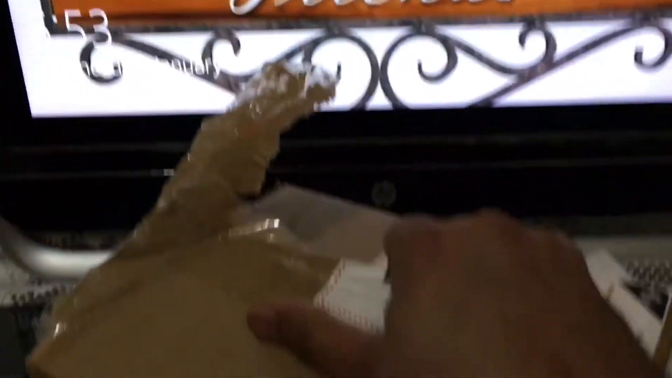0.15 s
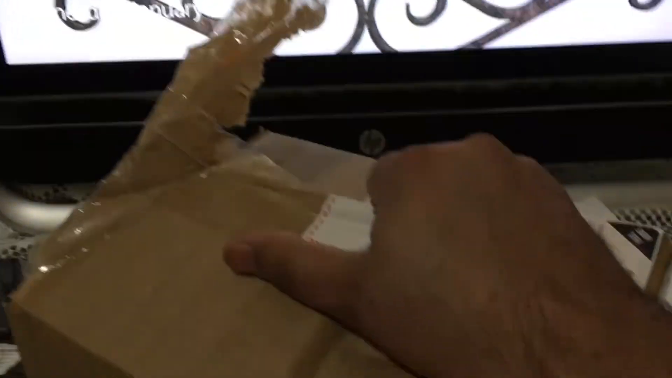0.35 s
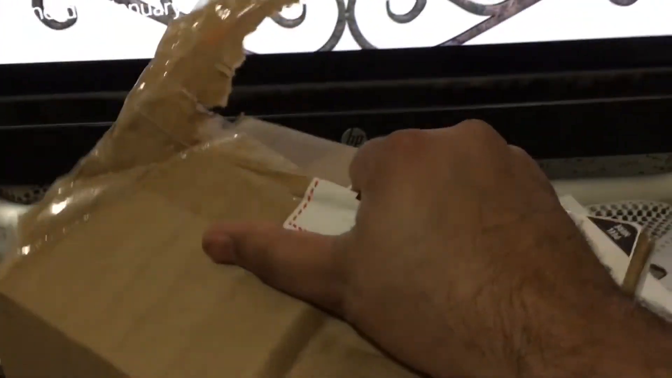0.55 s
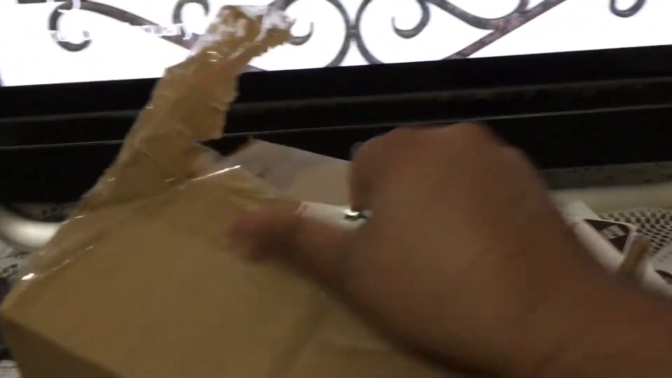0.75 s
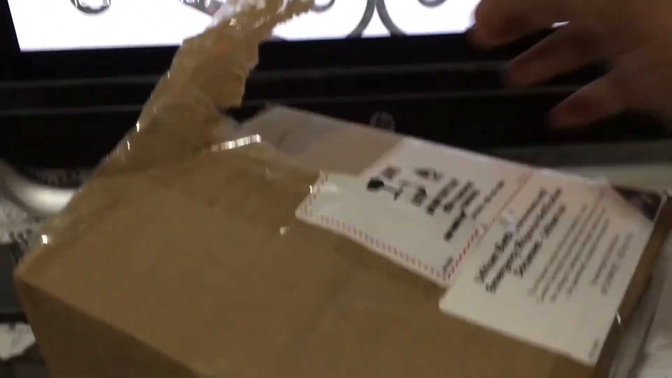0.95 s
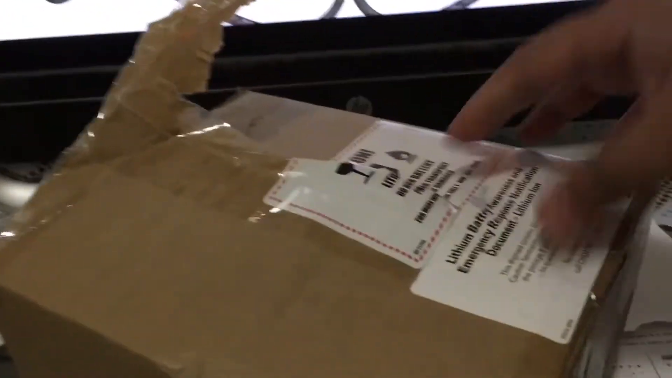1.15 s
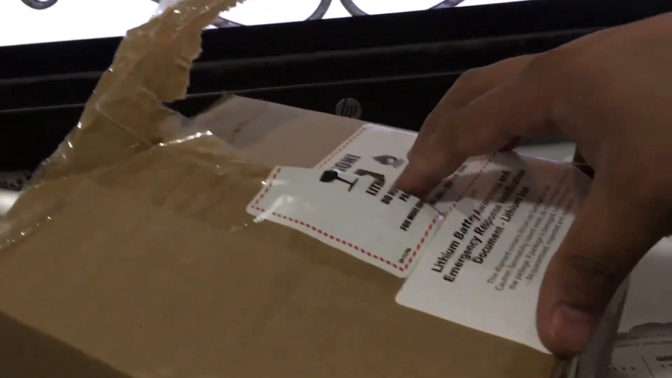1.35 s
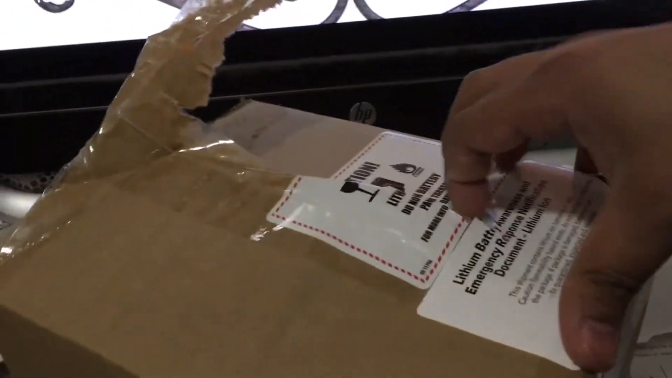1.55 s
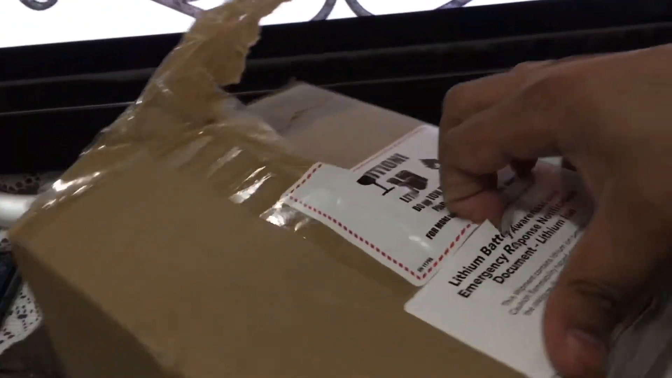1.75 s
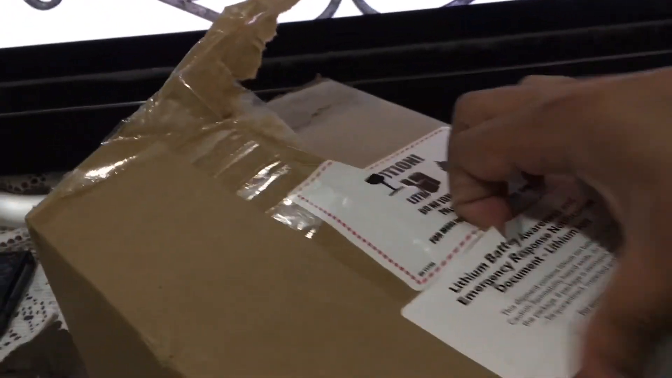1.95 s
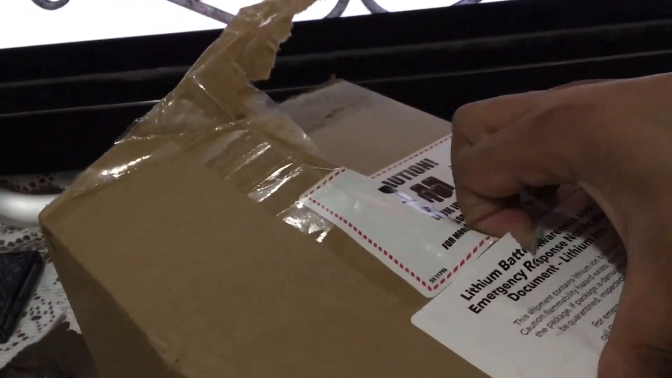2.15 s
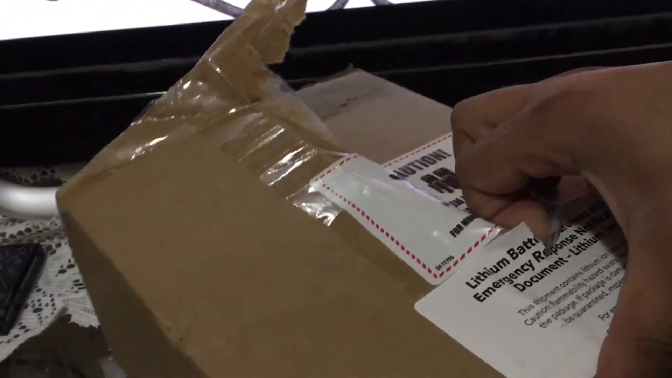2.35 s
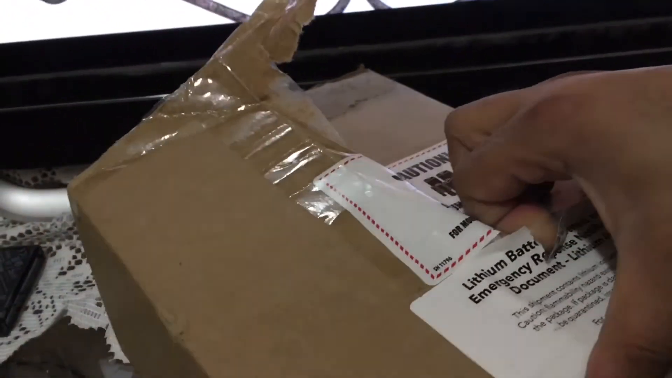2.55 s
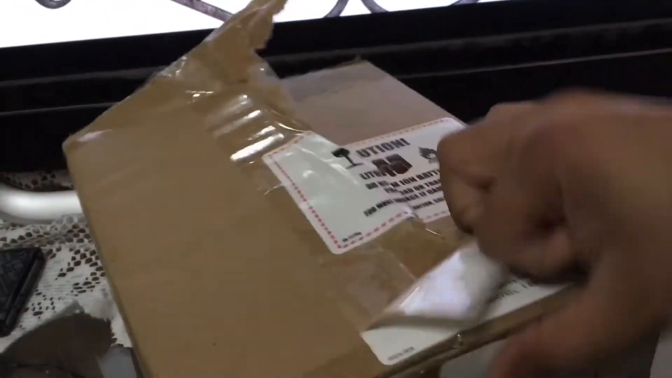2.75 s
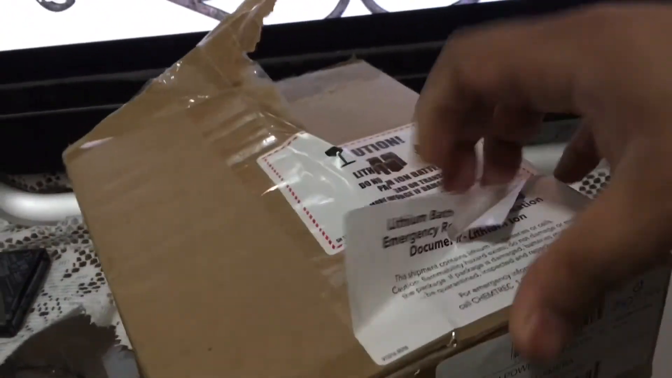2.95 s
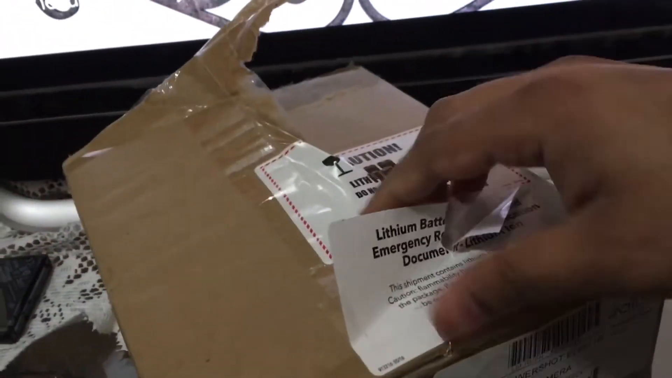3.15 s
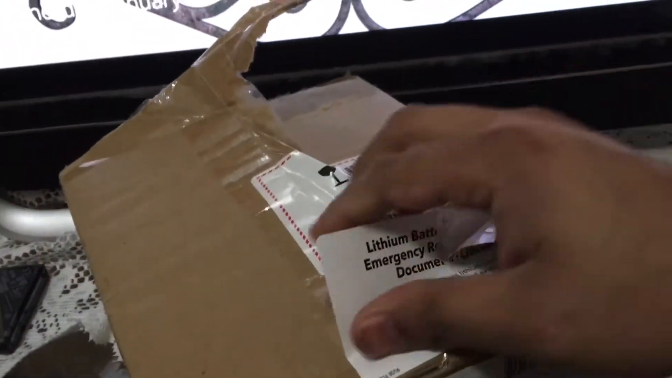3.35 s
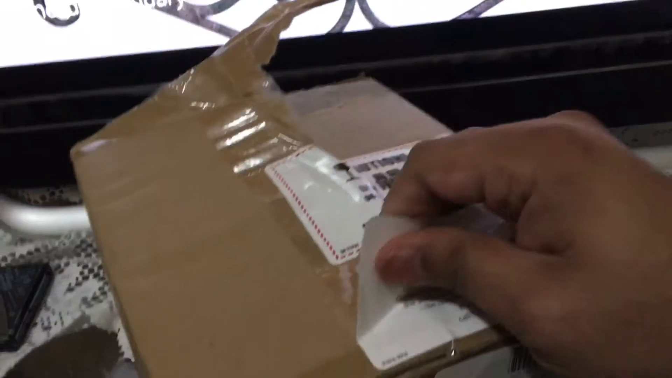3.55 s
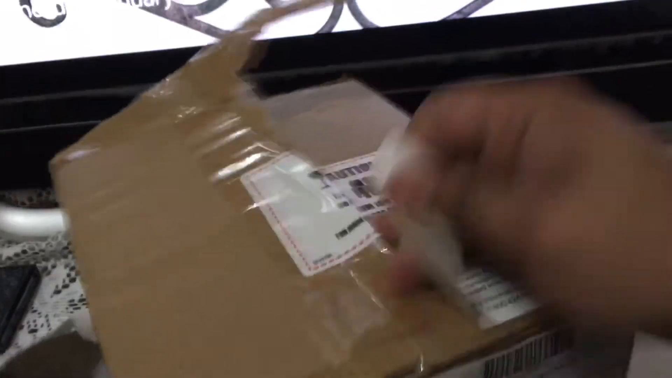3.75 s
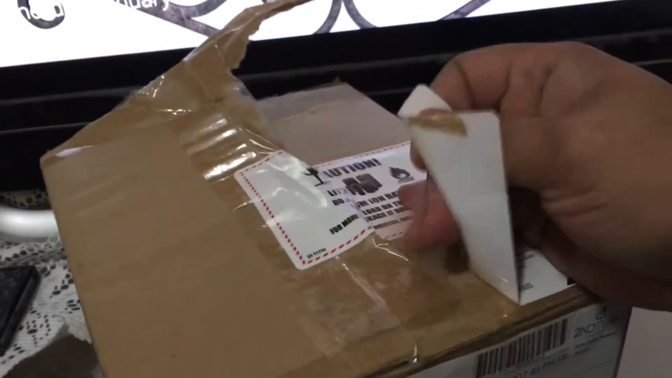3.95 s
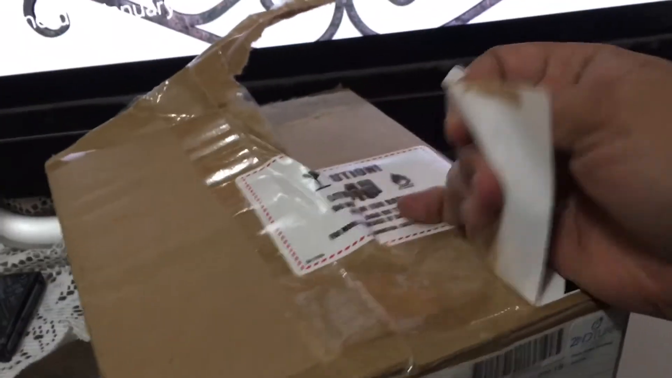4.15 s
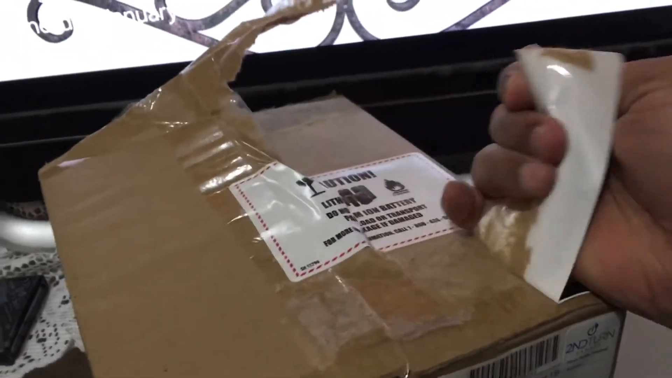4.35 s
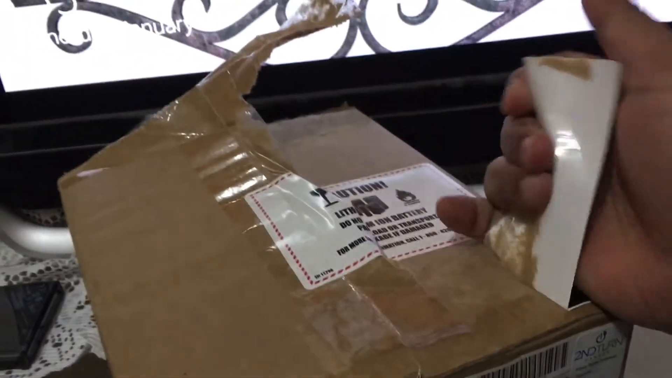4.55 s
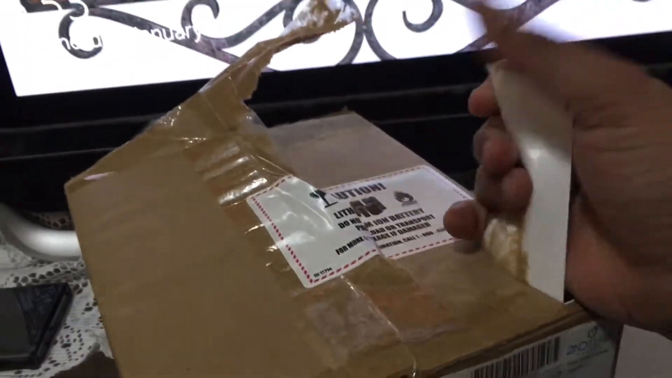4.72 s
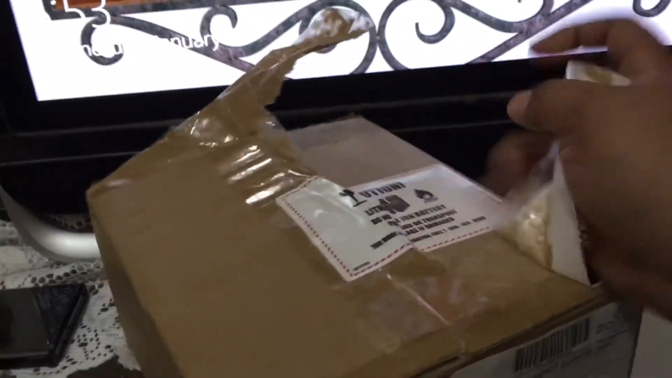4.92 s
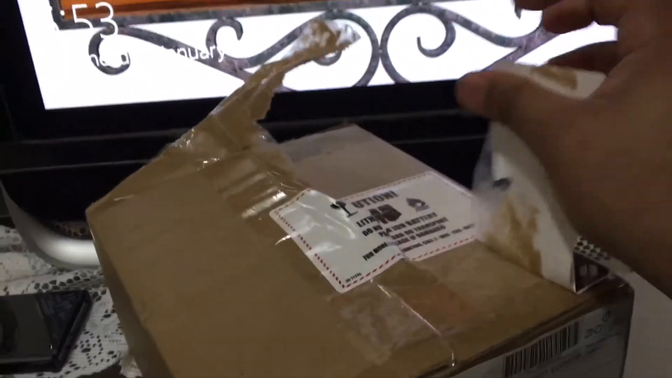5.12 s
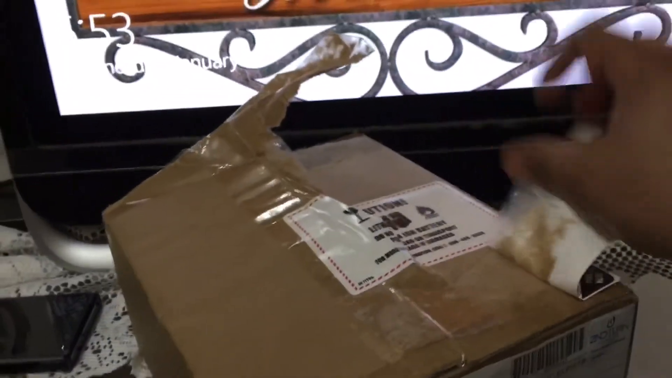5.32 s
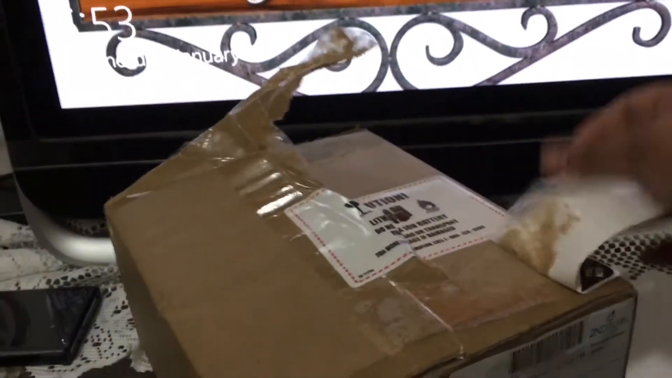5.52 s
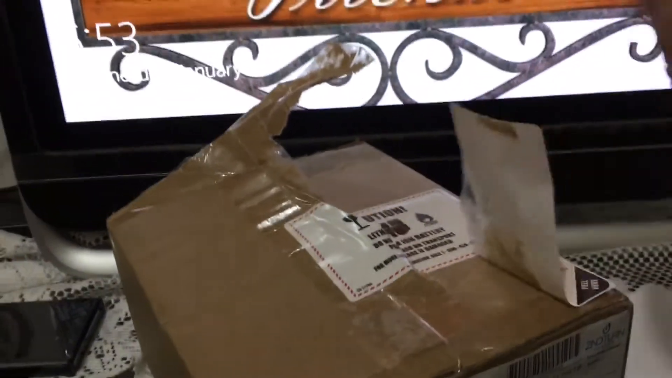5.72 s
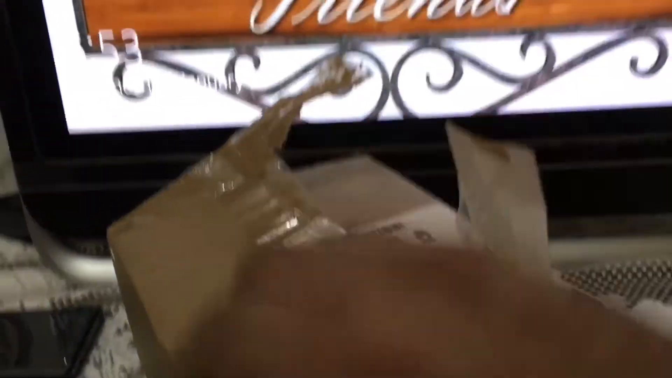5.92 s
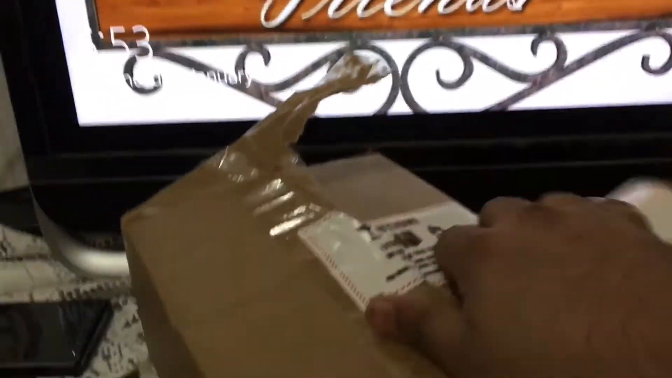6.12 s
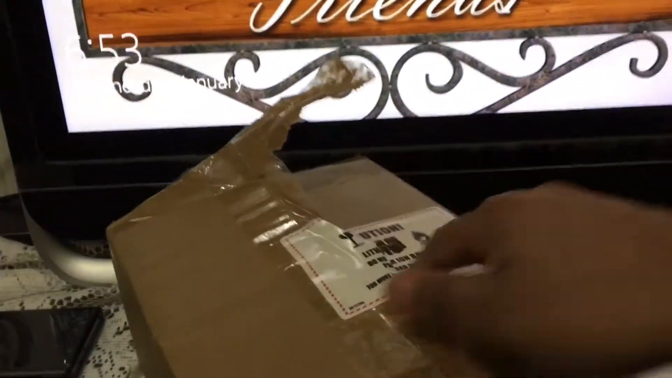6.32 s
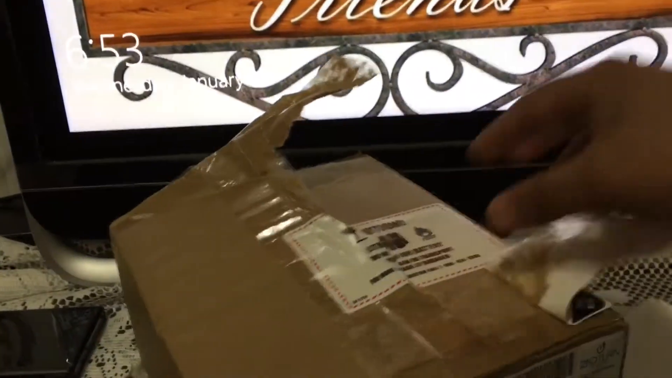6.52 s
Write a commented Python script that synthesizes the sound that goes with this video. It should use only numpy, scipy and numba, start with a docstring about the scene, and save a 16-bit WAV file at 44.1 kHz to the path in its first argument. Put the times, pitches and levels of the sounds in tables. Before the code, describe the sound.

A stuck label is picked at and torn off a cardboard box by hand, with sharp rips, film crackles and dry paper creases close up.

```python
"""A taped label is picked at and torn off a cardboard box by hand, close to a phone's microphone in a small room.
Adhesive rips, film ticks, paper creases and finger taps are cracks, slips and flutter coloured by the box.
Each pull crackles and each stroke rubs, as dense stick-slip noise; bumped panels and the jolted desk ring as decaying sines.
A short echo, a faint squeak and a low room hum lie around them; the microphone rounds off the loudest peaks."""
import sys
import numpy as np
from scipy import signal
from scipy.fft import rfft, irfft
from scipy.io import wavfile
from scipy.ndimage import uniform_filter1d
from numba import njit

SR = 44100
rng = np.random.default_rng(int(sys.argv[2]) if len(sys.argv) > 2 else 0)


def master_out(mix):
    """Clip the mix to full scale and print it as 16-bit PCM to the path in sys.argv[1]."""
    frames = np.transpose(np.atleast_2d(mix))
    ceiling = np.clip(frames, -1, 1)
    pcm = np.round(ceiling * 32767).astype(np.int16)
    wavfile.write(sys.argv[1], SR, pcm)


N = 294588
TIME = np.arange(N) / SR
STEPS = np.arange(0, N, 32) / SR  # coarse clock for the hand [s]


def undb(db):
    """Decibels to gain."""
    return 10 ** (np.asarray(db) / 20)


def unit(x):
    """Scale to rms 1."""
    return x / np.sqrt(np.mean(x ** 2))


def decay(t, t60):
    """Exponential decay that falls by 60 dB in t60 seconds."""
    return np.exp(-np.log(1000) * t / t60)


def add(out, s, x):
    """Mix x into out from time s on."""
    i = max(0, int(s * SR))
    out[i:i + len(x)] += x[:len(out) - i]


def slope(hz, points):
    """Read (frequency [Hz], value) points on a log-frequency axis."""
    f, value = np.transpose(points)
    return np.interp(np.log(hz + 1), np.log(f), value)


def humps(hz, peaks):
    """Gain in dB of a set of (frequency [Hz], width [Hz], gain [dB]) resonances."""
    return sum(db / (1 + (2 * (hz - f) / width) ** 2) for f, width, db in peaks)


def response(points, peaks=(), size=2048):
    """Causal (minimum-phase) impulse response of a colour with resonances on top."""
    hz = np.fft.rfftfreq(size, 1 / SR)
    gain = undb(slope(hz, points) + humps(hz, peaks))
    # folding the cepstrum puts all the energy after time zero
    cepstrum = irfft(np.log(gain))
    cepstrum[1:size // 2] *= 2
    cepstrum[size // 2 + 1:] = 0
    return irfft(np.exp(rfft(cepstrum)))


def tint(x, points, peaks=(), size=2048):
    """Pass x through a colour."""
    return signal.oaconvolve(x, response(points, peaks, size))[:len(x)]


def whiten(x, size=90):
    """Even out the broad shape of a burst's spectrum and keep its fine ripple."""
    spectrum = rfft(x)
    broad_power = uniform_filter1d(np.abs(spectrum) ** 2, size)
    return irfft(spectrum / np.sqrt(broad_power + 1e-12), len(x))


def walk(rate):
    """Random wander with a spread near 1: straight lines between `rate` random points per second."""
    knots = rng.standard_normal(2000)
    return np.interp(TIME * rate, np.arange(len(knots)), knots)


def slips(count, rate, spread_db):
    """Tiny stick-slip releases, `rate` per second on average: many small ones, a few large."""
    hit = rng.random(count) < rate / SR
    size = undb(spread_db * np.minimum(rng.exponential(size=count), 4))
    return hit * size * rng.standard_normal(count)


@njit
def resonator(x, hz, q):
    """Band-pass whose centre moves; gain 1 at the centre."""
    y, band, low = np.empty(len(x)), 0., 0.
    for i in range(len(x)):
        g = np.tan(np.pi * hz[i] / SR)
        v = (band + g * (x[i] - low)) / (1 + g * (g + 1 / q))
        band, low, y[i] = 2 * v - band, low + 2 * g * v, v / q
    return y


def curves(table):
    """Columns of a time table, joined by straight lines."""
    s, *columns = np.transpose(table)
    return [np.interp(TIME, s, c) for c in columns]


SWELL_DB = 1  # a stroke is this much weaker at its ends than in the middle


def stroke(start, length, attack_s, release_s):
    """One movement of the hand sets in, swells towards its middle and dies away."""
    t = STEPS - start
    arch = np.sin(np.pi * np.clip(t / length, 0, 1))
    swell = undb(SWELL_DB * (arch - 2 / np.pi))
    return swell * np.clip(t / attack_s, 0, 1) * np.exp(-np.maximum(t - length, 0) / release_s)


# the hand rests on the label and stirs faintly: (start [s], length [s], relative level [dB])
RESTS = [(0, .95, -65), (1.02, 4.2, -64), (6.108, 0.51, -60.5)]
REST_RUSTLE_DB, REST_RUB_DB = 0, -1  # against the crackle of the resting hand
# skin and paper slide over the box: (start [s], length [s], relative level [dB],
# crackle against that [dB], pitch of the paper [Hz])
RUBS = [(-0.05, 0.075, -35.5, -18, 1450), (0.03, 0.31, -44.5, -6.5, 1500), (0.36, 0.12, -52.5, -0.5, 2500),
        (0.48, 0.11, -48, -1, 3690), (0.67, 0.22, -46, -8, 2070), (0.81, 0.075, -39.5, -10, 1920),
        (1.57, 0.051, -36.5, -17, 1400), (1.71, 0.13, -43.5, -5.5, 1350), (2.13, 0.36, -47.5, -4.5, 1785),
        (2.69, 0.22, -48, -10, 1700), (3.16, 0.069, -46, -12.5, 1040), (3.32, 0.039, -48, -10, 1398),
        (3.48, .5, -45, -6, 1886), (4.28, 0.065, -36, -7, 1930), (4.83, 0.053, -39, -19, 2200),
        (5.0, 0.16, -51, -9, 2080), (5.59, 0.07, -44.5, -7.5, 2550), (6.13, 0.068, -47, -20, 2200),
        (6.3, 0.073, -44, -9.5, 2170), (6.53, 0.1, -49, -6.5, 2360)]
RUB_ATTACK_S, RUB_RELEASE_S, RUB_RUSTLE_DB = 0.022, 0.035, -6  # rustle: paper moved by a rub
# the tape is pulled and creeps off: (start [s], length [s], relative level [dB],
# rustle against that [dB], pitch of the film [Hz])
PEELS = [(0.543, 0.067, -44, -7.5, 8670), (1.998, 0.034, -53, -3, 5800), (2.139, 0.14, -61.5, -18, 12860),
         (2.336, 0.12, -48.5, -6.5, 9160), (2.445, 0.32, -45, -9.5, 6730), (3.552, .3, -43.5, -7, 13240),
         (4.048, 0.19, -35, -2, 12740), (4.208, 0.18, -37.5, -0.5, 9000), (4.652, 0.29, -46, -1, 13000),
         (4.918, .07, -40, 8.5, 9000), (5.483, 0.11, -43.5, -2, 8500)]
PEEL_ATTACK_S, PEEL_RELEASE_S, PEEL_RUB_DB = .04, 0.027, -10  # rub: box dragged by a pull


def handling():
    """Levels in dB of crackle, rustle and rubbing: all strokes add up in power."""
    moves = []
    for s, length, db in RESTS:
        resting = (STEPS >= s) & (STEPS < s + length)
        moves.append((resting, (db, db + REST_RUSTLE_DB, db + REST_RUB_DB)))
    for s, length, db, crackle, _ in RUBS:
        rub = stroke(s, length, RUB_ATTACK_S, RUB_RELEASE_S)
        moves.append((rub, (db + crackle, db + RUB_RUSTLE_DB, db)))
    for s, length, db, rustle, _ in PEELS:
        pull = stroke(s, length, PEEL_ATTACK_S, PEEL_RELEASE_S)
        moves.append((pull, (db, db + rustle, db + PEEL_RUB_DB)))
    shapes, levels = zip(*moves)
    powers = undb(levels).T ** 2 @ np.array(shapes) ** 2 + 1e-12
    return [np.interp(TIME, STEPS, 10 * np.log10(power)) for power in powers]


def flap_pitch(strokes):
    """The free flap bends from the pitch of one stroke to that of the next."""
    return curves(sorted((s + length / 2, hz) for s, length, _, _, hz in strokes))[0]


# colours of the friction sounds: (frequency [Hz], relative level [dB])
CRACKLE_COLOUR = [(1000, -36), (3000, -5), (5000, -4.5), (6200, -2), (8000, 0.5), (11000, 2), (13000, 0),
                  (16000, -3)]
RUSTLE_COLOUR = [(400, -34.5), (1000, -11.5), (1600, -4), (2300, -3), (3500, -5), (6000, -12), (14000, -39)]
RUBBING_COLOUR = [(30, -12.5), (100, -6), (220, -3), (400, 0), (700, -9.5), (1300, -5.5), (2500, -26),
                  (8000, -31.5)]
# narrow resonances of the stiff film: (frequency [Hz], width [Hz], gain [dB])
FILM_PEAKS = [(3830, 250, 3.5), (5550, 360, 7.5), (6750, 400, 4.5), (7770, 620, -2), (10400, 460, -8)]
# resonances of the cardboard and the taut tape: (frequency [Hz], width [Hz], gain [dB])
BOX_PEAKS = [(220, 110, 6), (376, 59, 1.5), (604, 270, -4.5), (738, 270, 6), (843, 72, 0.5),
             (1210, 38, -3.5), (1620, 87, 0.5), (2030, 290, 0), (2860, 190, -3), (4160, 72, 1),
             (6260, 1500, 3), (9050, 380, 3.5), (10550, 460, -5)]
FILM_RING, PAPER_RING, FLAP_Q = .8, 1.4, 6.  # how strongly film and paper ring, and how sharply
STRAY_PER_S, STRAY_DB = 57, -3.5  # lone ticks of the touched film, against the dense slips


def friction(crackle_rate=1500, crackle_spread_db=1.5, rustle_rate=1200, rustle_spread_db=4.0,
             hiss=0.79, uneven_db=2.0):
    """Adhesive threads part and paper bends in dense uneven slips; skin drags on cardboard as noise."""
    crackle_db, rustle_db, rub_db = handling()
    paper_hz, film_hz = flap_pitch(RUBS), flap_pitch(PEELS)
    grip_db = uneven_db * walk(55)
    crackle = unit(slips(N, crackle_rate, crackle_spread_db)) + hiss * rng.standard_normal(N)
    crackle = crackle + undb(STRAY_DB) * unit(slips(N, STRAY_PER_S, crackle_spread_db))
    rustle = unit(slips(N, rustle_rate, rustle_spread_db)) + hiss * rng.standard_normal(N)
    # the flap colours both as it grows and bends
    crackle = crackle + FILM_RING * resonator(crackle, film_hz, FLAP_Q)
    rustle = rustle + PAPER_RING * resonator(rustle, paper_hz, FLAP_Q)
    crackle = unit(tint(crackle, CRACKLE_COLOUR, FILM_PEAKS))
    rustle = unit(tint(rustle, RUSTLE_COLOUR, BOX_PEAKS))
    rubbing = unit(tint(rng.standard_normal(N), RUBBING_COLOUR, BOX_PEAKS))
    return (crackle * undb(crackle_db + grip_db - .5)
            + rustle * undb(rustle_db + grip_db - 2.0)
            + rubbing * undb(rub_db + grip_db - 4.0))


# colour of the echo: (frequency [Hz], relative level [dB])
ECHO_COLOUR = [(60, -18), (300, 4), (1000, -1), (2000, -4), (6000, -2.5), (15000, 0)]
# how long each band of the echo rings: (frequency [Hz], time to fall 60 dB [s])
ECHO_T60 = [(150, 0.34), (1000, 0.39), (4000, 0.48), (14000, 0.15)]
# hollow things around the desk sing along: (frequency [Hz], width [Hz], gain [dB])
ECHO_PEAKS = [(238, 17, 1.5), (368, 25, 6), (767, 5.4, 5), (1138, 27, 7.5), (1610, 23, 3), (1690, 17, 7.5),
              (2050, 36, 1.5), (2150, 30, 4), (3080, 25, 6), (3300, 60, 2), (4340, 30, 6.5), (5800, 35, 7),
              (8388, 55, 6)]


def room(x, echo_db=-11, gap_s=0.0018, early=1.42, early_s=0.016):
    """Desk and screen reflect almost at once; the walls leave a short tail whose bands die at their own rates."""
    t = TIME[:SR // 2]
    hz = np.fft.rfftfreq(len(t), 1 / SR)
    noise = rfft(rng.standard_normal(len(t)))
    tail = 0
    for k, (_, t60) in enumerate(ECHO_T60):
        share = slope(hz, [(f, j == k) for j, (f, _) in enumerate(ECHO_T60)])
        tail = tail + irfft(noise * share, len(t)) * decay(t, t60)
    tail = tail * np.minimum(t / gap_s, 1) ** 2 * (1 + early * np.exp(-t / early_s))
    tail = tint(tail / np.sqrt(np.sum(tail ** 2)), ECHO_COLOUR, ECHO_PEAKS, size=8192)
    return x + undb(echo_db) * signal.fftconvolve(x, tail)[:N]


# colour of the quiet room: (frequency [Hz], relative level [dB])
HUM_COLOUR = [(20, -31), (55, -3), (90, -10.5), (150, -11.5), (300, -10.5), (450, -10.5), (600, -15.5),
              (1200, -15.5), (1450, -25), (2000, -19.5), (3000, -31.5), (6000, -36.5), (16000, -46)]
# its resonances: (frequency [Hz], width [Hz], gain [dB])
HUM_PEAKS = [(122, 20, 9), (352, 92, 2), (1160, 110, 0.5)]
# two tones that change as the phone moves: (time [s], low tone level [dB], high tone level [dB])
HUM_TONES = [(0, -61.5, -62), (2.5, -65.5, -59), (3.6, -58.5, -72.5), (4.8, -73, -59), (5.6, -59, -59),
             (6.68, -54, -82)]
# their mean pitches: (low tone [Hz], high tone [Hz])
HUM_TONES_HZ = (204, 385.4)
HUM_DB = -52.5  # rush level, before its waver


def hum(waver_db=-1.5, drift_hz=4):
    """Low rush of the room, as coloured noise, with two wavering tones, perhaps a fan."""
    noise = unit(tint(rng.standard_normal(N), HUM_COLOUR, HUM_PEAKS, size=8192))
    rush = noise * undb(HUM_DB + waver_db * walk(2.6))
    tones = 0
    for hz, db in zip(HUM_TONES_HZ, curves(HUM_TONES)):
        level = undb(db + 2 * walk(4.7)) * np.sqrt(2)
        turns = np.cumsum(hz + drift_hz * walk(25)) / SR
        tones = tones + level * np.sin(2 * np.pi * turns)
    return rush + tones


# fingers land on the cardboard: (time [s], relative level [dB], length of the contact [ms], brightness [dB])
TAPS = [(0.2085, -11.5, 1.1, 4), (0.262, -28, .4, -15), (0.7977, -29.5, 2, 9), (0.8208, -38, 1.1, -9),
        (0.879, -34.5, 11.7, -11), (1.602, -42, 12, 0), (1.636, -35.5, 0.78, -9), (5.157, -33, 5.8, -2),
        (6.1006, -31, 0.32, 22), (6.104, -30, 1.3, -13), (6.1383, -36.5, 0.81, -14),
        (6.6034, -34.5, 4.2, 5.5)]
# the thin film crinkles in ticks: (time [s], relative level [dB], pitch [Hz], brightness [dB])
TICKS = [(0.559, -37.5, 8910, 11), (0.8535, -36, 830, -4), (1.456, -45, 3400, -17), (1.6841, -38, 6000, 5),
         (2.125, -38.5, 1210, -10), (2.2609, -23.5, 1890, 3.5), (2.3546, -28, 9340, 17),
         (2.365, -31, 8790, 14), (2.444, -22, 7140, 2), (2.4595, -15, 12220, 1.5), (2.6358, -16, 6560, -7),
         (2.672, -20, 3930, -5), (2.7025, -13, 6840, -3), (2.7126, -5.5, 5950, 4), (3.055, -39.5, 5690, -8),
         (3.064, -45, 7940, -2), (3.499, -38.5, 600, -12.5), (3.5684, -12.5, 3780, 0.5),
         (3.652, -29, 5600, -2), (3.786, -33.5, 12470, -1), (4.4222, -27, 5000, -2), (4.5158, -33, 9140, 2),
         (4.948, -17.5, 8800, 3), (5.4499, -35.5, 3870, -10), (6.4225, -35, 3130, -9)]
# the adhesive lets go and rings the box: (time [s], relative level [dB], length of the tear [ms],
# pitch of the freed patch [Hz], brightness [dB])
RIPS = [(0.8746, -24.5, 1.7, 2260, 11.5), (2.6875, -9, 4.9, 2980, 10), (2.695, -23.5, 32, 885, 5),
        (2.7326, -8, 11.1, 1710, 4), (3.812, -9, 16.8, 2230, 6.5), (3.8338, -14, 11.6, 1800, 4.5),
        (3.8537, -6.5, 0.64, 1920, -1.5), (3.8667, -11, 4, 1690, -1.5), (3.8786, -9, 1.1, 1900, -5.5),
        (3.8852, -10, 1.54, 1870, 1.5), (4.0345, -8, 0.47, 1690, 7.5), (4.1449, -9.5, 1.45, 6570, -0.5),
        (4.1482, -11.5, 0.71, 2220, -6), (4.2256, -5.5, 0.8, 2040, 3), (4.2384, -6, 2.3, 1950, 3.5),
        (4.2454, -7.5, 0.74, 1690, 0), (4.2717, -8, 0.76, 1690, 0), (4.2815, -11.5, 3.2, 1690, -2.5),
        (4.2962, -8, 1.5, 2110, -0.5), (4.3486, -9.5, 0.64, 2090, -1), (4.81, -19.5, 6.3, 2620, -0.5),
        (4.8179, -16, 3.1, 2350, 5.5), (4.8238, -13.5, 2.2, 1860, -5), (4.977, -20.5, 6, 2620, 2),
        (4.987, -17, 3.6, 2610, -1), (4.9944, -23, .3, 2000, 5), (5.458, -32.5, 11, 3580, 4),
        (5.558, -33.5, 6, 2470, 16), (5.59, -34.5, 9.4, 3020, 7)]
# the stiff paper label buckles in dry clicks: (time [s], relative level [dB], pitch [Hz], brightness [dB])
CREASES = [(2.2931, -20.5, 1950, 7.5), (2.468, -19, 1930, 11), (3.5367, -30, 3240, 9),
           (3.6838, -31.5, 2030, 9), (4.3661, -18, 1540, -20), (4.489, -20, 3500, 1.5),
           (4.591, -39, 3580, -8), (4.6055, -26.5, 4450, 9), (4.6509, -30, 2260, -1.5),
           (4.657, -28.5, 2260, -33), (4.6705, -13.5, 5240, -11), (4.737, -24.5, 2270, -12),
           (4.748, -28, 3930, 9), (4.762, -28.5, 3220, 4), (4.7773, -29, 2200, 4),
           (5.7271, -25.5, 1920, -1), (5.751, -36.5, 1520, -38)]
# colour of each kind, bands against the 2 kHz band before brightness:
# (box [dB], edge [dB], air [dB], ring of the patch [dB])
TAP_COLOUR = (-2, -11.5, -19.5, 3)
TICK_COLOUR = (-5.5, 0, 4, 7)
RIP_COLOUR = (-4, -5.5, -8, 9.5)
CREASE_COLOUR = (-31, -4, -14.5, 9)
TICK_MS, CREASE_MS, TAP_HZ = 0.65, 0.57, 2500  # time to give way; pitch of the tapped label
EDGE_SHARE = 0.42  # brightness lifts the air band fully and the edge band by this share


def releases():
    """Every release as (s, dB, tear ms, box dB, edge dB, air dB, ring Hz, ring dB)."""
    kinds = [(RIP_COLOUR, RIPS),
             (TICK_COLOUR, [(s, db, TICK_MS, hz, bright) for s, db, hz, bright in TICKS]),
             (CREASE_COLOUR, [(s, db, CREASE_MS, hz, bright) for s, db, hz, bright in CREASES]),
             (TAP_COLOUR, [(s, db, ms, TAP_HZ, bright) for s, db, ms, bright in TAPS])]
    return [(s, db, ms, box, edge + EDGE_SHARE * bright, air + bright, hz, ring)
            for (box, edge, air, ring), rows in kinds for s, db, ms, hz, bright in rows]


# centres of the box, middle, edge and air bands: (frequency [Hz])
SNAP_BANDS_HZ = [500, 2000, 5200, 11500]


def snaps(flutter=0.53, flutter_s=0.0017, flutter_hz=2200, crack_s=.0005, first_crack=2.78, rip=0.29,
          sub_db=-13, top_db=-2, ring_width=0.24, size=4096):
    """Each release is a sharp crack, a run of slips while the tear travels, and a brief flutter of the freed patch."""
    out, t = np.zeros(N), np.arange(size) / SR
    lead = size // 64  # samples of room before the crack
    dull = signal.butter(1, flutter_hz, fs=SR, output="sos")
    for s, db, tear_ms, box_db, edge_db, air_db, ring_hz, ring_db in releases():
        length = max(tear_ms, 0) / 1000
        after = np.maximum(t - length, 0)
        tearing = unit(slips(size, 9000, 2.3)) * np.exp(-after / crack_s)
        # the bright crack is over at once; the heavier patch flaps on, duller
        flapping = signal.sosfilt(dull, rng.standard_normal(size))
        force = rip * tearing + flutter * flapping * np.exp(-after / flutter_s)
        force[0] += first_crack  # the first thread breaks hardest
        bands = zip(SNAP_BANDS_HZ, (box_db, 0, edge_db, air_db))
        colour = [(50, box_db + sub_db), (170, box_db), *bands, (16000, air_db + top_db)]
        patch = (ring_hz, ring_width * ring_hz, ring_db)
        sound = tint(whiten(np.roll(force, lead)), colour, [*BOX_PEAKS, patch])
        # the level holds for the tear and the crack that starts it
        held = (length + 0.0013) * SR
        add(out, s - lead / SR, sound * undb(db) * np.sqrt(held / np.sum(sound ** 2)))
    return out


# the box is bumped: (time [s], level before the soft onset and decay [dB], pitch [Hz])
BUMPS = [(0.2086, -15.5, 770), (1.604, -26, 115), (2.6894, -7, 71), (2.691, -11.5, 165.5),
         (2.6933, -7, 286), (2.737, -19, 130), (3.463, -31, 425), (3.823, -22, 51.8), (3.829, -15, 85),
         (3.834, -17.5, 234), (4.147, -16, 170), (4.8244, -14, 267), (5.63, -32.5, 180), (6.107, -25, 171),
         (6.172, -28, 183), (6.19, -30.5, 260), (6.608, -27.5, 260)]
# a panel of this pitch rings this long; higher ones die sooner by this power
BUMP_T60_S, BUMP_HZ, BUMP_DAMPING = .044, 200, 0.46


def bumps(push_s=0.00083):
    """A soft push makes a box panel swing for a few cycles."""
    out, t = np.zeros(N), TIME[:SR // 3]
    for s, db, hz in BUMPS:
        t60 = BUMP_T60_S * (BUMP_HZ / hz) ** BUMP_DAMPING
        push = 1 - np.exp(-t / push_s)
        add(out, s, undb(db) * np.sin(2 * np.pi * hz * t) * push * decay(t, t60))
    return out


# jolts that set the box and the desk ringing: (time [s], relative level [dB])
JOLTS = [(2.691, -32.5), (2.738, -17), (3.835, -29)]
# their ring: (frequency [Hz], relative level [dB], time to fall 60 dB [s])
DESK_MODES = [(426, 0, 0.29), (920, 4.5, 0.061), (1333, -8.5, 0.28), (1655, -1, 0.29), (1995, -19, 0.24),
              (3120, -13.5, 0.38), (3450, -11.5, 0.36), (4600, -27, 0.31), (5173, -15.5, 0.34),
              (7289, -31.5, 0.3), (8140, -28, 0.23), (8721, -20, 0.14)]
# colour of the loose rattle: (frequency [Hz], relative level [dB])
RATTLE_COLOUR = [(50, -9.5), (270, 6), (700, 5), (1700, 1), (4000, -3), (9000, -28.5), (16000, -20.5)]


def jolts(rattle=0.69, rattle_t60=0.23):
    """The box knocks on the desk: modes of wandering pitch ring on, blurred by a loose rattle."""
    out, t = np.zeros(N), TIME[:SR // 2]
    for s, db in JOLTS:
        ring = 0
        for hz, mode_db, t60 in DESK_MODES:
            wander_hz = (30 + .012 * hz) * walk(300)[:len(t)]
            turns = np.cumsum(hz + wander_hz) / SR + rng.random()
            ring = ring + undb(mode_db) * np.sin(2 * np.pi * turns) * decay(t, t60)
        noise = unit(tint(rng.standard_normal(len(t)), RATTLE_COLOUR, BOX_PEAKS))
        add(out, s, undb(db) * (0.51 * ring + rattle * noise * decay(t, rattle_t60)))
    return out


# the bending label squeaks faintly: (start [s], length [s], pitch [Hz], level at the peak [dB])
SQUEAK = (5.31, .19, 1680, -58)


def squeak(waver_hz=5):
    """A thin tone of wavering pitch swells and fades as the label bends."""
    s, length, hz, db = SQUEAK
    swell = np.sin(np.pi * np.clip((TIME - s) / length, 0, 1))
    turns = np.cumsum(hz + waver_hz * walk(40.8)) / SR
    return undb(db) * swell * np.sin(2 * np.pi * turns)


def scene():
    """Tape, box and hand in the room; only the tape and the friction feed the echo."""
    tape = undb(0.5) * snaps()
    return (room(tape + friction()) + bumps() + jolts() + squeak() + hum())[None]


def record(dry):
    """The phone's microphone drops the deepest rumble, rounds off the loudest peaks and cuts the top."""
    rumble_cut = signal.butter(3, 33, "high", fs=SR, output="sos")
    top_cut = signal.ellip(10, .2, 70, 15950, fs=SR, output="sos")
    sound = signal.sosfilt(rumble_cut, dry)
    rounded = sound / (1 + (sound / .85) ** 4) ** .25  # never exceeds 0.85
    return signal.sosfilt(top_cut, rounded)


dry = scene()
out = record(dry)
master_out(out)
```